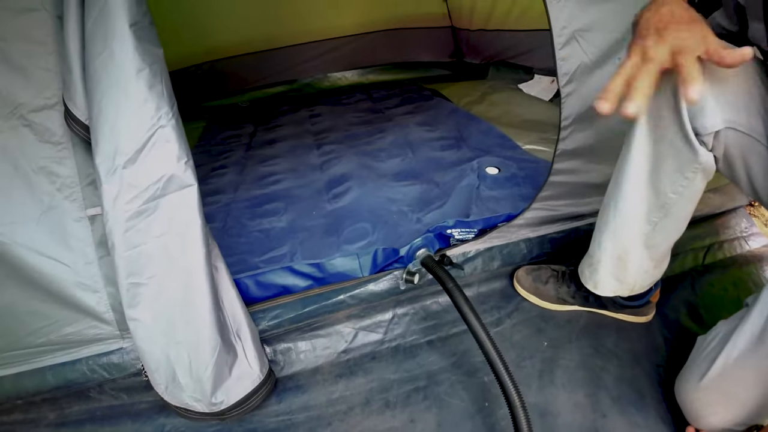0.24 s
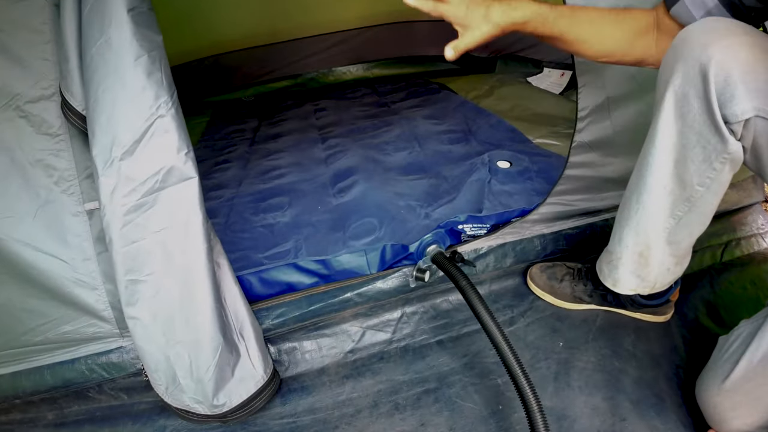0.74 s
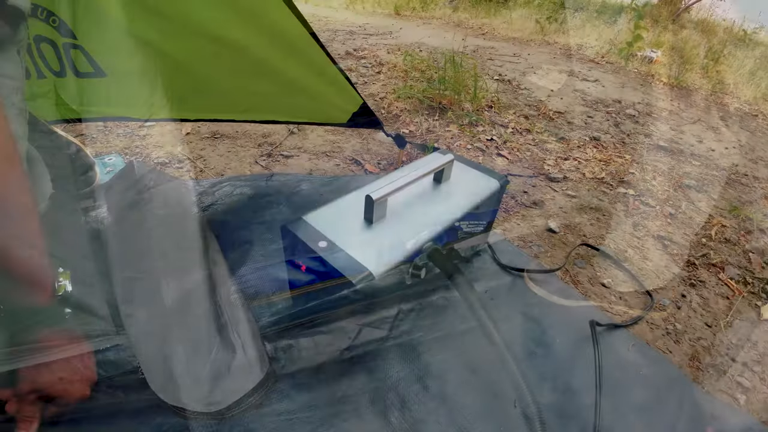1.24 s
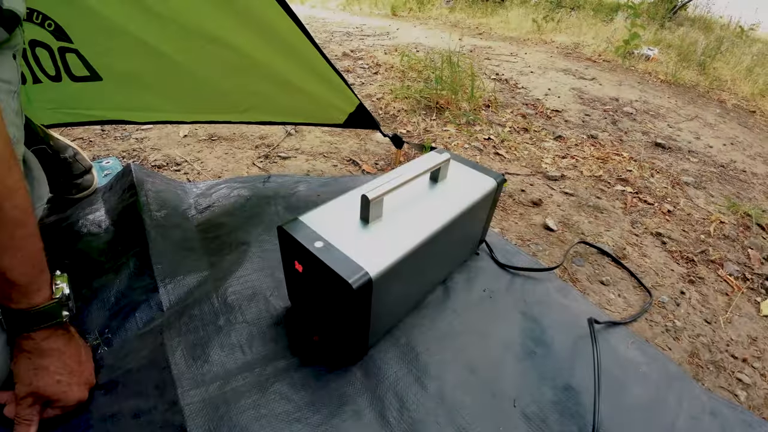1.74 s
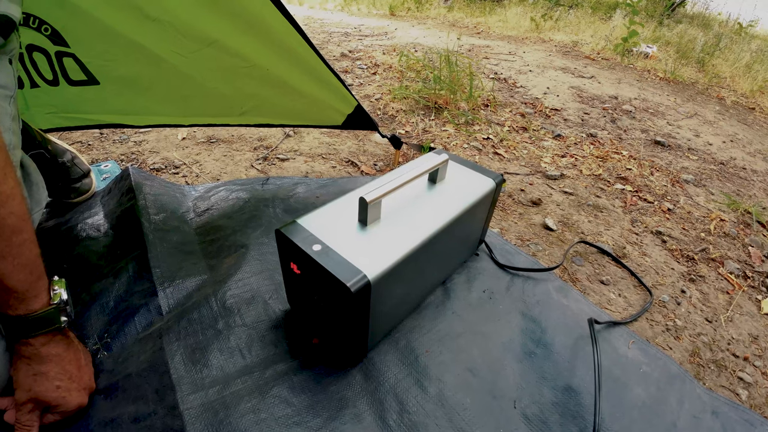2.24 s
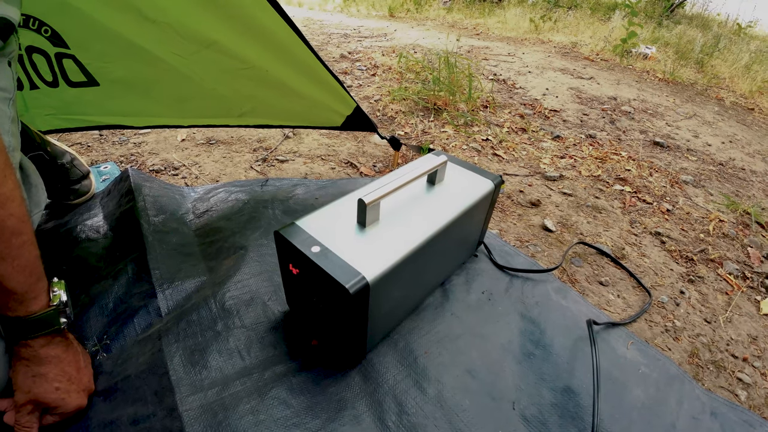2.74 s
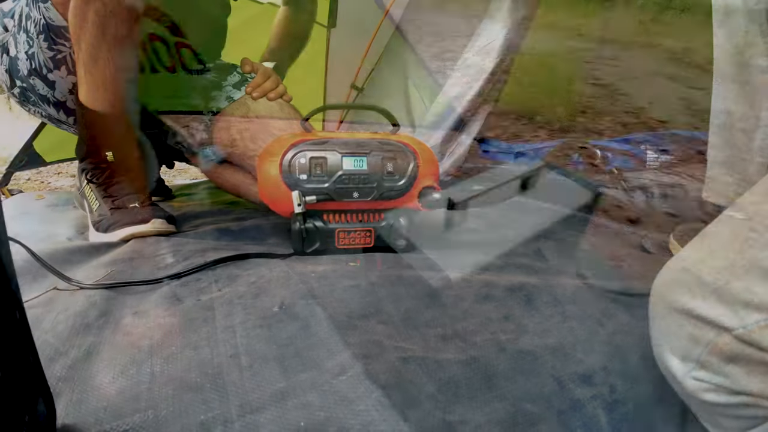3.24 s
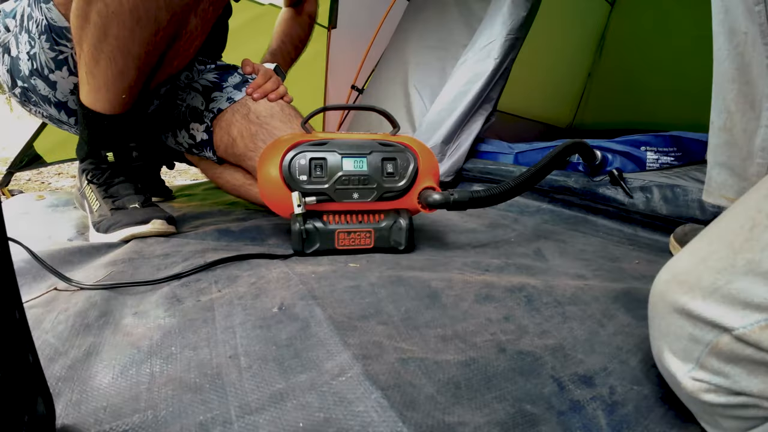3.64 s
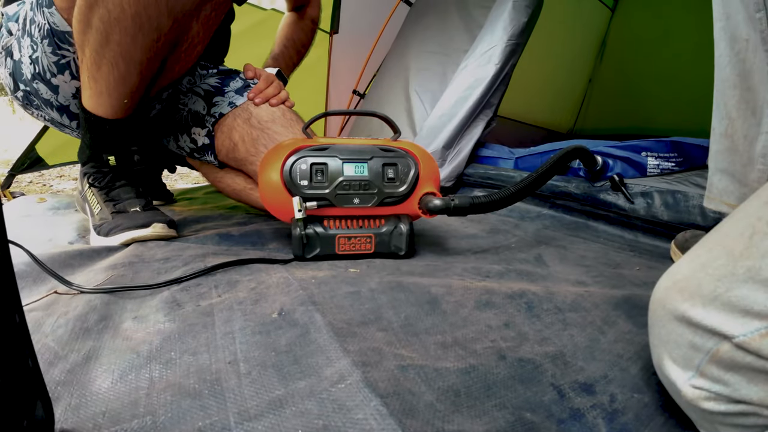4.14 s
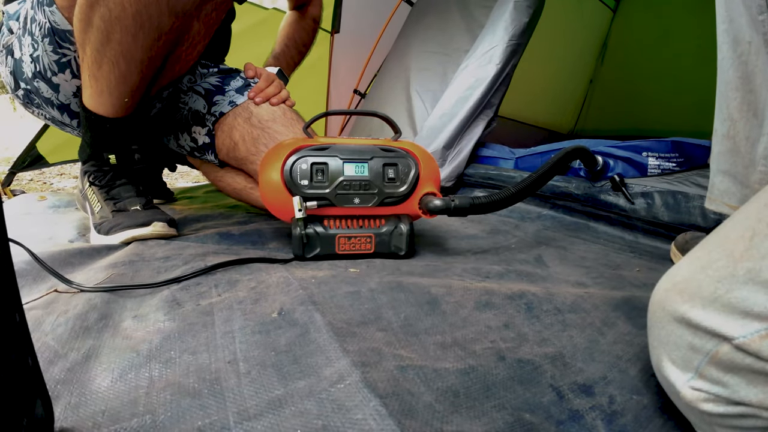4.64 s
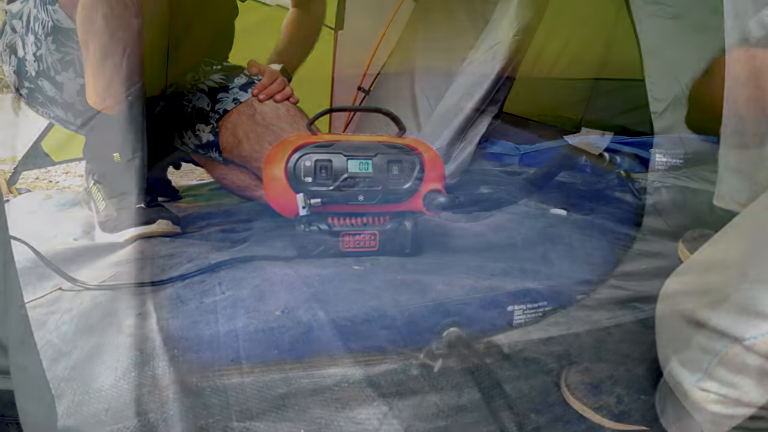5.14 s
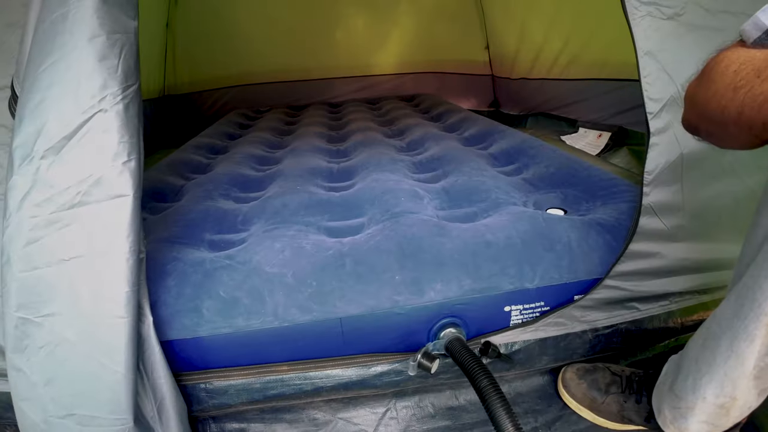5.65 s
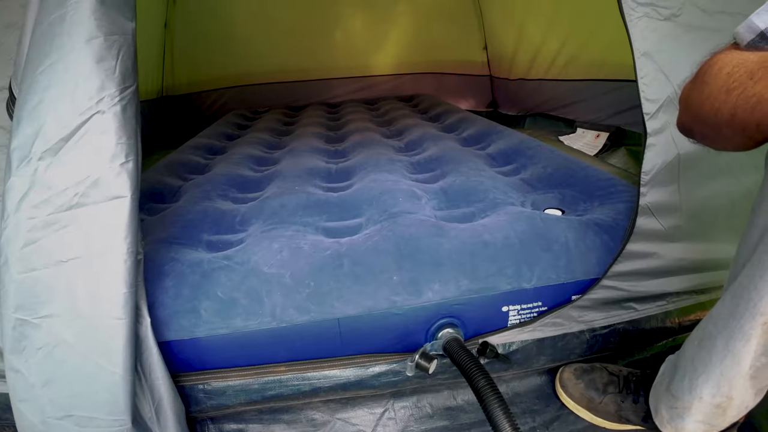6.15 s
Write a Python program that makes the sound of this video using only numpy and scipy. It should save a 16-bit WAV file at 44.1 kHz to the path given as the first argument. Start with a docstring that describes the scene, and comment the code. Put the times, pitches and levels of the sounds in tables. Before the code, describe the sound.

A portable electric inflator whines and hums steadily while air rushes through its hose; late on, a higher, faster run blends in over it.

```python
"""An electric inflator in a tent

A blower pushes air down a ribbed hose into a mattress: its shaft hums, its brushes buzz, its eight blades
whine and air rushes through. Hum, buzz and whine are tones tied to the shaft's turning; the rush is shaped noise.
The whines swell and wander between the ears as the microphone moves through their standing waves.
A faster run with a deeper roar, very faint at first, blends in late; a soft bump sounds on the groundsheet."""
import sys
import numpy as np
from scipy import signal
from scipy.fft import rfft, irfft
from scipy.io import wavfile

SR = 44100
rng = np.random.default_rng(int(sys.argv[2]) if len(sys.argv) > 2 else 0)


def output_pcm(signal):
    """Save a mono or channel-first signal as 16-bit PCM at the path in sys.argv[1].

    Samples are clipped to [-1, 1] before scaling.
    """
    pcm = np.clip(np.atleast_2d(signal).T, -1, 1) * 32767
    wavfile.write(sys.argv[1], SR, np.round(pcm).astype(np.int16))


N = 281799
T = np.arange(N) / SR  # time of every sample [s]

BLADES = 8
SWAY_DB = 2  # how far the moving microphone sways a short-wave tone

# How sound reaches the two microphone ports:
# (frequency [Hz], likeness of the ports [0-1], left lead [rad], left over right [dB])
PORT_TABLE = [(40, .99, 0, 0), (170, .96, 0, 0), (300, .985, 0, 0), (430, .95, .45, 0), (550, .78, 1.3, 3),
              (610, .65, .4, -2), (700, .92, -1.1, -4), (840, .93, -.75, -3), (930, .75, -.6, -3),
              (1030, .8, -2.9, 0), (1190, .7, -2.7, 4), (1260, .92, -.3, 1), (1450, .92, -.7, -1),
              (1850, .78, -.2, -1), (2120, .86, -.5, 1), (2350, .32, -.9, 0), (3400, .12, .3, -3),
              (6000, .2, 0, 0), (14000, .2, 0, 0)]


def amp(db):
    """Turn decibels into a gain."""
    return 10 ** (np.asarray(db) / 20)


def curves(rows):
    """Draw straight lines through a time table: each column at every sample."""
    times, *columns = np.transpose(rows)
    return [np.interp(T, times, column) for column in columns]


def spectra(rows, hz):
    """Read the columns of a frequency table at the given frequencies, along a log scale."""
    table_hz, *columns = np.transpose(rows)
    return [np.interp(np.log(hz + 1), np.log(table_hz), column) for column in columns]


def wander(rate_hz):
    """Make a slow random curve of rms 1 by fading noise out above the given rate."""
    step = 64  # a slow curve needs only one point per 64 samples
    count = N // step + 2
    hz = np.fft.rfftfreq(count, step / SR)
    noise = rfft(rng.standard_normal(count))
    slow = irfft(noise / (1 + (hz / rate_hz) ** 4))
    return np.interp(np.arange(N) / step, np.arange(len(slow)), slow / slow.std())


def shaft(speed, jitter_hz, flutter_hz):
    """Add up the shaft's turning into an angle; its speed flutters a little in the turbulent air."""
    turns_per_s = curves(speed)[0] + jitter_hz * wander(flutter_hz)
    return 2 * np.pi * np.cumsum(turns_per_s) / SR


def motor(angle, orders, sway_rad):
    """Hum of the unbalanced shaft and motor: tones on whole multiples of the shaft speed."""
    out = np.zeros((2, N))
    mean_speed = angle[-1] / (2 * np.pi * T[-1])
    for multiple, db in orders:
        k = round(multiple)
        same, lead, balance_db = spectra(PORT_TABLE, k * mean_speed)
        phase = k * angle + rng.uniform(0, 2 * np.pi)
        # where the ports hear different things, the tone sways most as the microphone moves
        loose = np.sqrt(1 - np.clip(same, 0, 1) ** 2)
        for ear, side in enumerate((.5, -.5)):
            gain = amp(db + side * balance_db + loose * SWAY_DB * wander(2.2))
            turn = side * lead + loose ** 2 * sway_rad * wander(0.34)
            out[ear] += gain * np.cos(phase + turn)
    return out


def air(spectrum, modes, ripple_db, off_axis):
    """Turbulence: noise coloured by the duct; near reflections comb it differently at each port."""
    hz = np.fft.rfftfreq(N, 1 / SR)
    db = spectra(spectrum, hz)[0]
    for centre_hz, width_hz, lift_db in modes:
        db = db + lift_db * np.exp(-np.log(2) * (2 * (hz - centre_hz) / width_hz) ** 2)

    same, lead, balance_db = spectra(PORT_TABLE, hz)
    same = np.clip(same, 0, 1)
    loose = np.sqrt(1 - same ** 2)
    shared, separate = rfft(rng.standard_normal((2, N)))
    # off_axis scales the lead: a source straight ahead (0) reaches both ports together
    left = shared * amp(balance_db / 2) * np.exp(1j * off_axis * lead)
    right = (same * shared + loose * separate) * amp(-balance_db / 2)

    # eight reflections per port, 1 to 12 ms late, felt where the ports are unlike
    delays_s = rng.uniform(0.001052, .012, (8, 2, 1))
    comb = sum(np.cos(2 * np.pi * hz * delay) for delay in delays_s) / 2
    colour = amp(db + ripple_db * loose ** 2 * comb)
    # the last factor makes the spectrum table read as dB per Hz
    return irfft(np.array([left, right]) * colour, N) * np.sqrt(SR / 2)


def impeller(angle, multiple, level_db, pan_db, lead, fading_db, flutter_db, tremor_db):
    """One overtone of the blades chopping air at the outlet; it fades and turns in standing waves."""
    fading_hz = 4.8  # how fast the moving microphone crosses the standing waves
    turn_rad = 0.014  # how far that turns the tone between the ears, per multiple of the blade rate
    k = round(multiple)
    phase = k * BLADES * angle + rng.uniform(0, 2 * np.pi)
    lead = lead + k * turn_rad * wander(fading_hz)
    sides = np.array([[.5], [-.5]])
    ears = amp(sides * pan_db)
    ears = 2 * ears / np.linalg.norm(ears, axis=0)  # panning keeps the total power
    # the hand that holds the microphone trembles: shorter waves feel it more
    tremble_db = k * tremor_db * wander(11)
    unsteady_db = fading_db * wander(fading_hz) + flutter_db * wander(25) + tremble_db
    return ears * amp(level_db + unsteady_db) * np.cos(phase + sides * lead)


def steady_whine(angle):
    """Whine of the steady run: blade overtones that drift between the ears and recede near the end."""
    # (multiple of the blade rate, level before drift [dB rms], left lead before drift [rad],
    #  depth of slow fading [dB], late decline [dB per s])
    overtones = [(1, -36.7, -.7, .4, 1.8), (2, -40.2, -1.55, .6, 5), (3, -37.1, -1.7, .6, 6.7),
                 (4, -42.8, 0, .9, .6), (5, -49.8, -1.1, 2, 2.8)]
    # Slow drift of the four strong overtones, each table:
    # (time [s], swell [dB], left over right [dB], extra left lead [rad])
    drifts = {
        # the blade tone starts out of step between the ears, leans right, then drifts to the middle
        1: [(0, 6, 1, 4), (.8, 2.5, -8.5, 4), (1, 1.5, -11, 5), (1.3, 5, -22, 3.5), (1.7, 1, -11, 0.5),
            (2.2, 5.5, -8, 1.3), (3.25, 2.9, -6.5, -1), (4.6, 3, -8.5, 0.84), (6.39, 2.5, 1, 1.6)],
        # the second leans left half way through
        2: [(0, -0.5, 3, 0.23), (.6, 5.3, 1, -0.32), (1.1, 4, -1, -0.59), (1.7, 5, 7, 0.14),
            (2.5, 3.5, 11.5, 0.37), (4.6, 2.3, 3, -0.14), (6.39, -4.5, -1, 1.3)],
        # the shrill third flares on the left for half a second
        3: [(0, 2.5, -1, 0.5), (.4, 1, 1, 1), (.8, 6, 9, -2.4), (1.28, 1.5, -9, -2), (1.43, 4, 20, -2),
            (1.92, 8.5, 11, -7), (2.17, -0.5, -5, -7), (2.6, 5.5, 1.5, -6), (4.4, 5, 4.5, -6.2),
            (4.85, 3, -1, -7.5), (5.3, -0.5, 7.5, -6.5), (6.39, -2, -6, -10.5)],
        # the fourth keeps equal levels in both ears and swells several times
        4: [(.08, 10.5, 0, 0.6), (.27, -2, 0, 1.5), (.6, 4, 0, -1.2), (1.05, 4, 0, -2.5),
            (1.82, -2, 0, -3.5), (2.08, 8, 0, -1.4), (2.9, -0.5, 0, -1.6), (3.21, 8, 0, -0.3),
            (3.4, -3.5, 0, 1), (3.95, 6, 0, 3.5), (4.75, 5, 0, 1.43), (6.39, 1, 0, 1)],
    }
    # the whine recedes from 5.2 s on, as the faster run takes over
    late_s = np.maximum(T - 5.2, 0)
    out = np.zeros((2, N))
    for multiple, db, lead, fading_db, decline in overtones:
        k = round(multiple)
        swell_db, pan_db, turn = curves(drifts[k]) if k in drifts else (0, 0, 0)
        level_db = db + swell_db - decline * late_s
        out += impeller(angle, k, level_db, pan_db, lead + turn, fading_db, flutter_db=0.45, tremor_db=0.41)
    return out


def brushes(angle, db, fall_db):
    """The commutator's buzz: faint high multiples of the shaft speed, of uneven strength."""
    multiples = np.arange(12, 48)
    levels_db = db - fall_db * np.log2(multiples / multiples[0])  # falls by fall_db per octave
    starts = rng.uniform(0, 2 * np.pi, (len(multiples), 2, 1))
    out = np.zeros((2, N))
    for k, level_db, start in zip(multiples, levels_db, starts):
        out += amp(level_db + SWAY_DB * wander(2)) * np.cos(k * angle + start)
    return out


def steady_run():
    """The steady run: one shaft angle drives hum, whine and buzz, with rushing air beside them."""
    # shaft speed: (time [s], speed [turns per s])
    speed_table = [(0, 298.5), (.4, 298.7), (.72, 297.75), (1.27, 298.05), (1.8, 297.3), (2.12, 297.9),
                   (2.75, 297.5), (3.95, 297.33), (4.26, 297.75), (5.07, 297.65), (5.7, 298.1),
                   (6.39, 298.2)]
    # changes in strength: (time [s], hum [dB], rush [dB])
    effort = [(0, -1.5, 0.5), (.6, 0, 0.5), (1.3, 0.5, 0.5), (2.5, 0, 1), (3.5, 0.5, 1), (4.6, 0, 0.2),
              (5.4, -2, -0.5), (6.39, -5, -1.5)]
    # tones of the unbalanced shaft and the motor: (multiple of shaft speed, level before effort [dB])
    hum_orders = [(1, -32.7), (3, -48), (4, -39), (5, -41), (6, -53), (9, -51), (15, -61), (17, -57),
                  (20, -60), (28, -62), (37, -60), (48, -55)]
    # rushing air before resonances and effort: (frequency [Hz], level [dB per Hz])
    rush_spectrum = [(25, -85.5), (85, -86.5), (120, -78.5), (190, -78.5), (270, -66.5), (450, -69),
                     (1100, -67), (1750, -67.5), (2350, -74.5), (3300, -72.5), (4800, -74.5), (5600, -79.5),
                     (9000, -82.5), (14300, -92)]
    # resonances of housing and hose: (frequency [Hz], width [Hz], lift [dB])
    duct = [(712, 71, 4.5), (828, 87, 10), (952, 17, 5), (1394, 74, 6), (1506, 210, 4), (2083, 150, 5.5)]

    angle = shaft(speed_table, jitter_hz=0.063, flutter_hz=11)
    hum_db, rush_db = curves(effort)
    hum = motor(angle, hum_orders, sway_rad=.6) * amp(hum_db + .6 * wander(7))
    gusts_db = .3 * wander(20)
    rush = air(rush_spectrum, duct, ripple_db=3.5, off_axis=1.0) * amp(rush_db + gusts_db)
    buzz = brushes(angle, db=-63.5, fall_db=4)
    return hum + rush + steady_whine(angle) + buzz


def fast_run():
    """The faster run creeps in over the steady one: roar and whine first, then the hum."""
    # shaft speed: (time [s], speed [turns per s])
    speed_table = [(4.0, 347.6), (5.1, 347.7), (5.6, 348.2), (6.39, 348.1)]
    # how far this run has blended in: (time [s], level [dB])
    blend_table = [(3.4, -31), (4.2, -9), (4.8, -2.5), (5.4, 0.5), (5.9, 2), (6.39, 2.5)]
    # tones of shaft and motor: (multiple of shaft speed, level before blending [dB])
    hum_orders = [(1, -36.5), (2, -43.5), (5, -56), (7, -45), (10, -53), (11, -51), (23, -59), (35, -70),
                  (40, -63)]
    # the extra roar of air: (frequency [Hz], level before blending [dB per Hz])
    roar_spectrum = [(30, -90), (65, -78), (100, -80.5), (150, -74), (260, -62), (390, -73), (520, -63.5),
                     (640, -70), (870, -61), (1050, -79.5), (2000, -75), (8000, -93)]
    # whine: (multiple of the blade rate, level before blending [dB rms], left lead [rad],
    #  depth of slow fading [dB])
    overtones = [(1, -34.9, 0, .5), (2, -44.8, .1, .3), (3, -46.5, -2, 1.2), (4, -51, -1.4, 2)]

    angle = shaft(speed_table, jitter_hz=0.088, flutter_hz=12.0)
    blend = amp(curves(blend_table)[0])
    hum = motor(angle, hum_orders, sway_rad=0.99)
    roar = air(roar_spectrum, [], ripple_db=5.0, off_axis=0.24)
    whine = np.zeros((2, N))
    for multiple, db, lead, fading_db in overtones:
        whine += impeller(angle, multiple, db, 0, lead, fading_db, flutter_db=0.7, tremor_db=0.68)
    # the hum firms up later: its blend in dB is 1.2 times as deep
    return blend * (roar + whine) + blend ** 1.2 * hum


def bump():
    """A soft bump on the groundsheet: a short low sine that swells and dies, alike in both ports."""
    # (time [s], peak of the swell [dB], frequency [Hz], decay [s])
    bump_row = (4.625, -45.5, 50, .012)
    start_s, db, hz, decay_s = bump_row
    age = np.maximum(T - start_s, 0)
    swell = age / decay_s * np.exp(1 - age / decay_s)
    return amp(db) * np.sin(2 * np.pi * hz * age) * swell


def scene():
    """Add both runs of the blower and the bump."""
    return steady_run() + fast_run() + bump()


def record(dry):
    """The recorder's band limit: a steep filter takes away everything well above 14480 Hz."""
    low_pass = signal.firwin(801, 14480, window=("kaiser", 9), fs=SR)
    return signal.oaconvolve(dry, low_pass[None], "same")


dry = scene()
out = record(dry)
output_pcm(out)
```